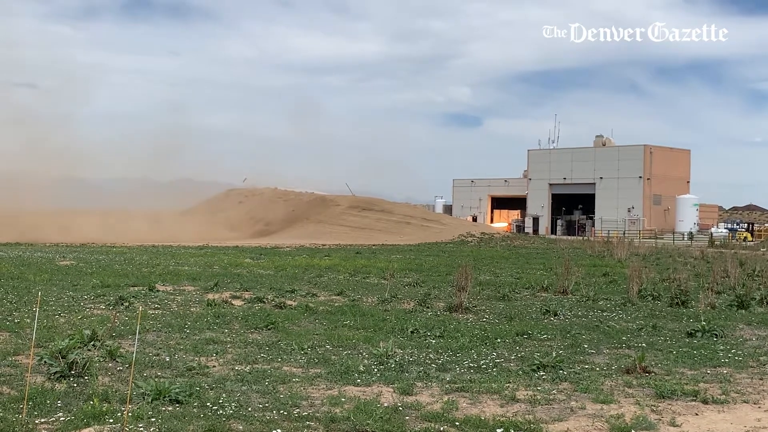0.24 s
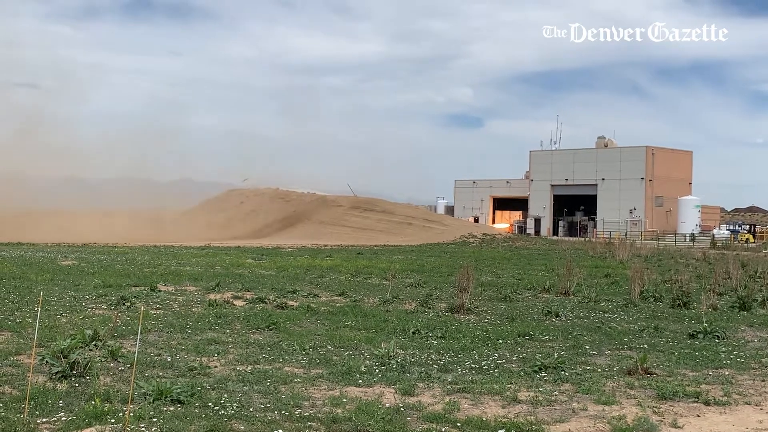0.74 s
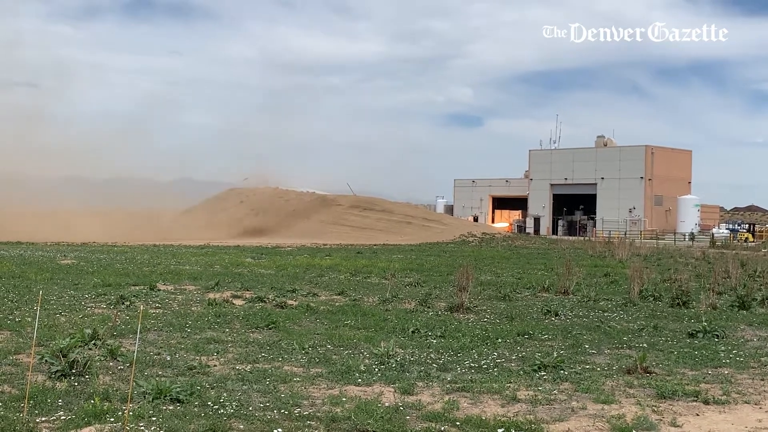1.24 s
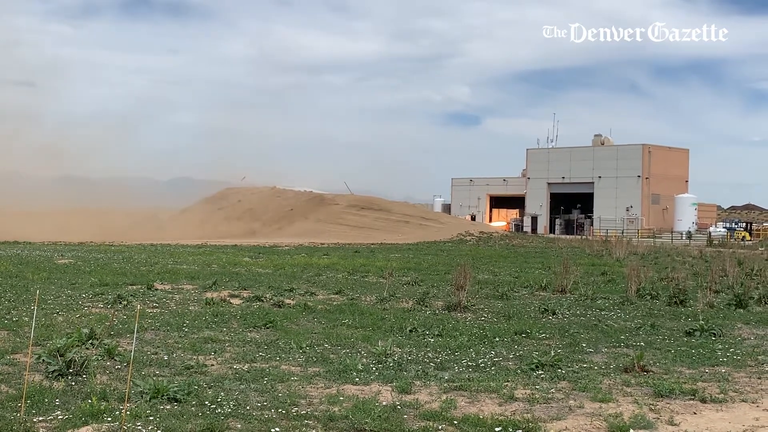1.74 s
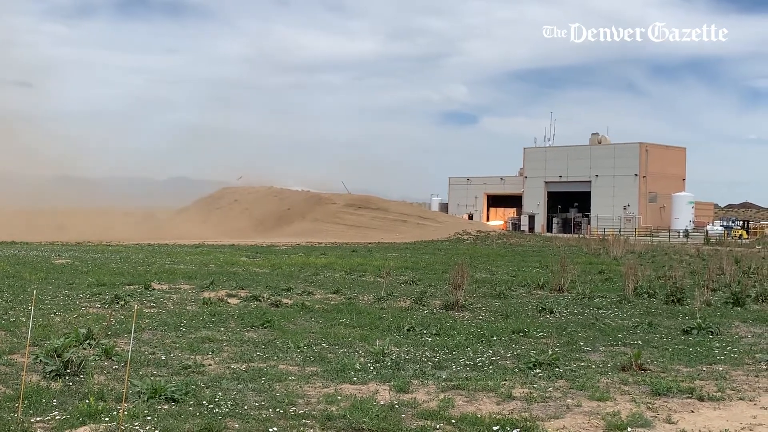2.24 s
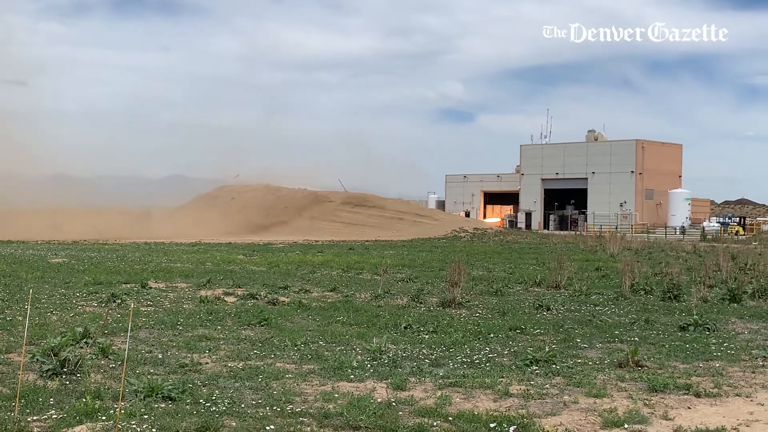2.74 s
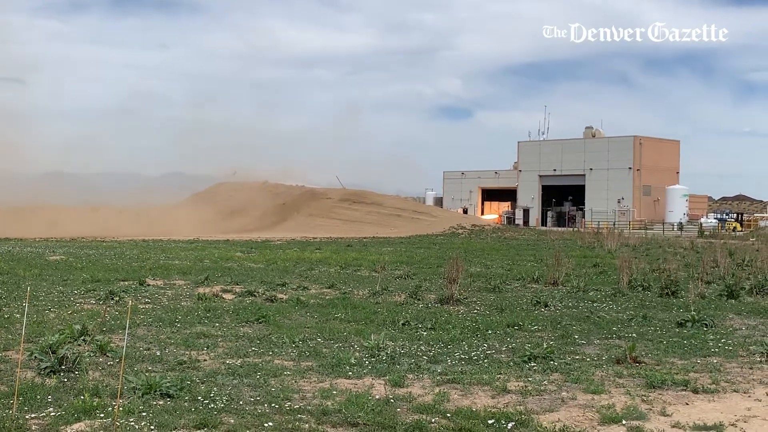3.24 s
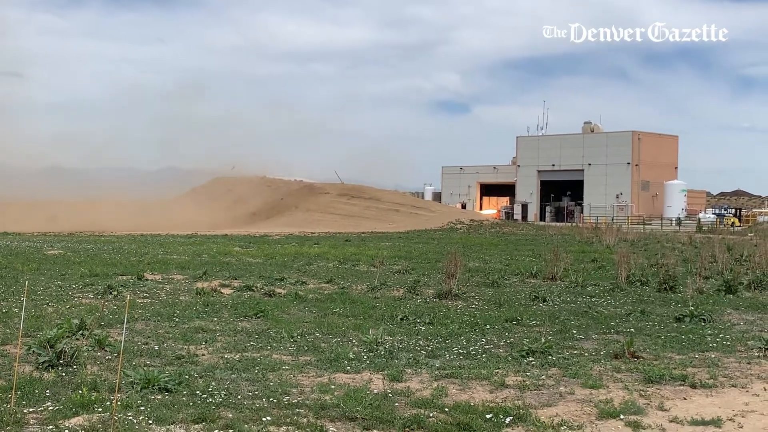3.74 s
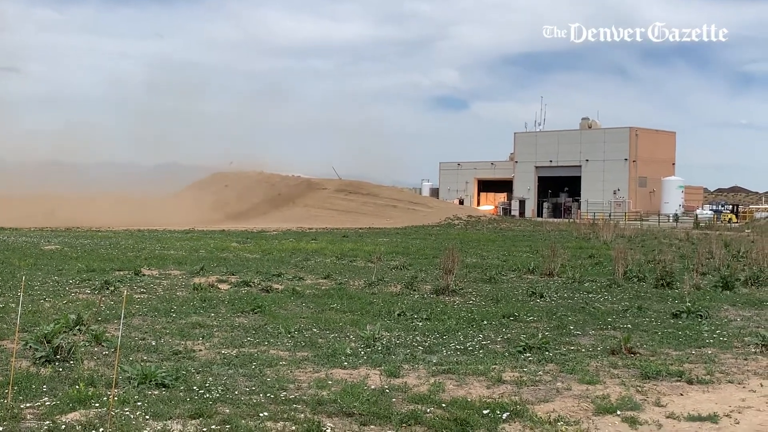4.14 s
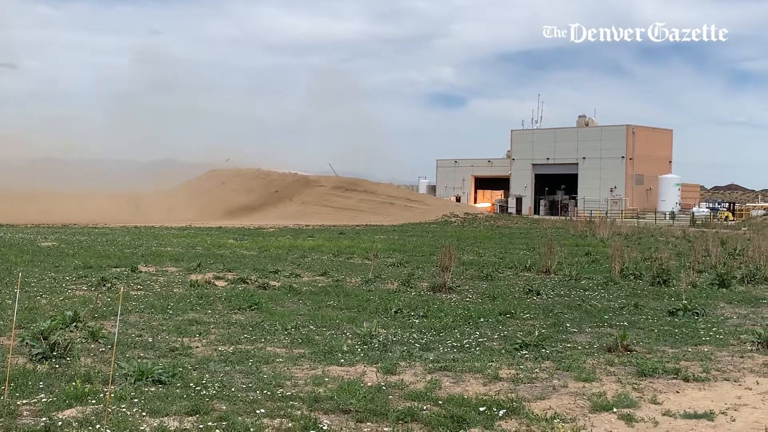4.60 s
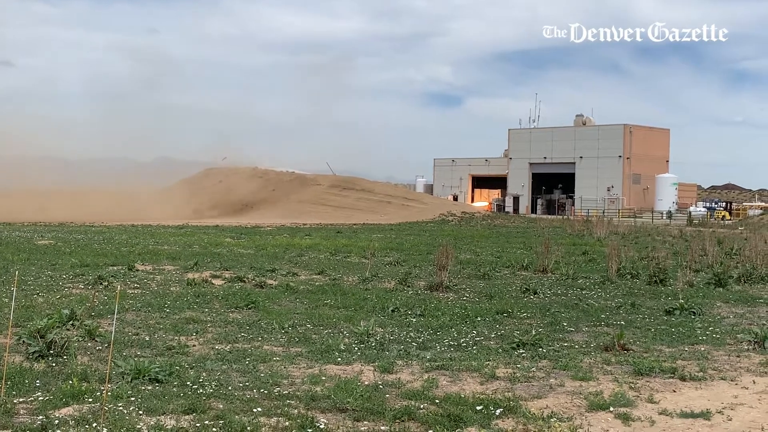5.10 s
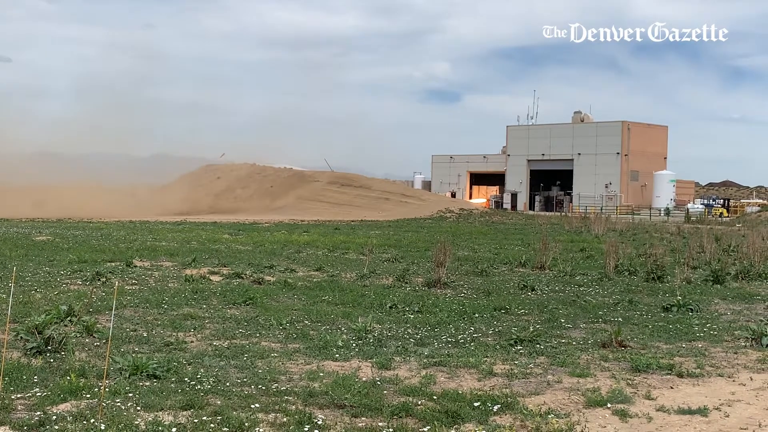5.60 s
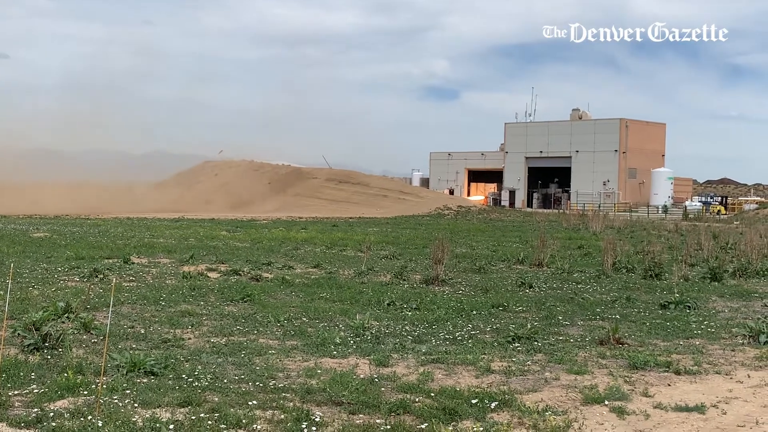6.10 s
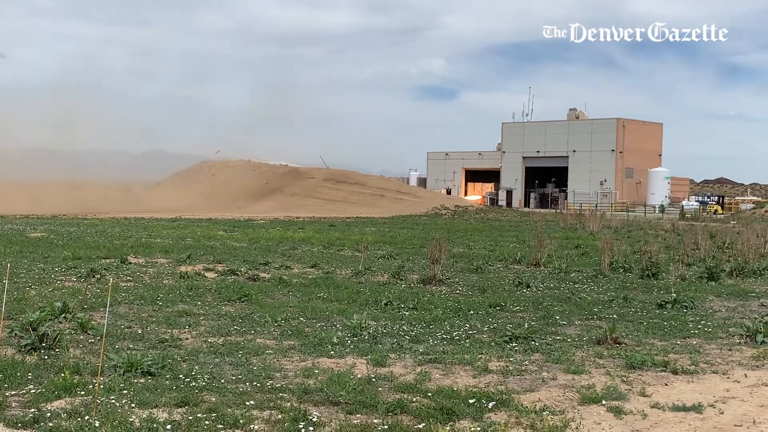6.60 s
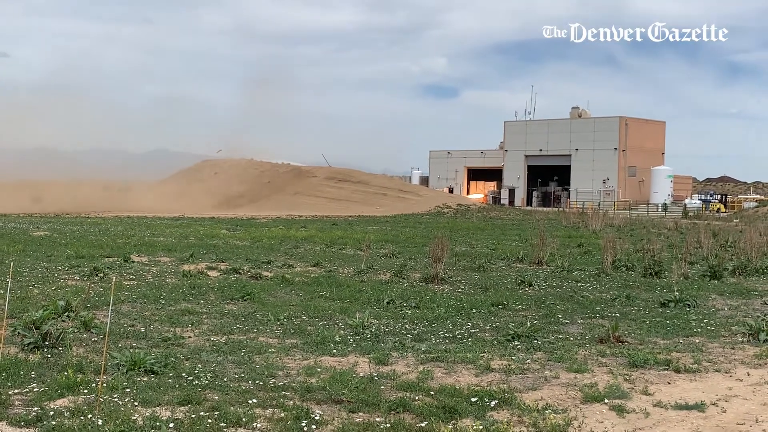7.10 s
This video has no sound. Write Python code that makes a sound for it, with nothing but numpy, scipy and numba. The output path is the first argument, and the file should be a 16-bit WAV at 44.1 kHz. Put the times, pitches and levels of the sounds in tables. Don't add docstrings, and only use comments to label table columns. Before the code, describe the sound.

Already at full force, a distant jet of burning exhaust thunders without pause over open grass. Low, thick rumbling fills the sound, while a rasping roar and faint hiss flutter above it, slowly dulling and brightening as if gently filtered. Sound scatters slightly from both sides. Near the end the hand-held phone turns and the hiss changes colour subtly; its bass stays compressed and crowded.

```python
import sys
import numpy as np
from scipy import signal
from scipy.fft import rfft, irfft, next_fast_len
from scipy.io import wavfile
from scipy.ndimage import uniform_filter1d, minimum_filter1d
from numba import njit

SR = 44100
rng = np.random.default_rng(int(sys.argv[2]) if len(sys.argv) > 2 else 0)


def put_to_file(sound):
    columns = np.atleast_2d(sound).T
    safe = np.clip(columns, -1, 1)
    whole_steps = np.round(safe * 32767)
    wavfile.write(sys.argv[1], SR, whole_steps.astype(np.int16))


def invert_db(x):
    u = np.asarray(x, float) / 20
    return 10 ** u


N = 324135
SIZE = next_fast_len(N + SR)
HZ = np.maximum(np.arange(SIZE // 2 + 1) * SR / SIZE, 1)

# frequency in Hz, density in dB per Hz.
RUMBLE_SPECTRUM = [(22.0, -70), (32.0, -60), (43.0, -48), (54.0, -40.5), (65.0, -38), (90.0, -38),
                   (130.0, -38.5), (170.0, -42.5), (220.0, -48), (300.0, -54.5), (370.0, -64.0),
                   (450.0, -66.3)]
# frequency in Hz, density in dB per Hz.
ROAR_SPECTRUM = [(370.0, -65), (520.0, -62), (750.0, -61.5), (1350.0, -63.5), (2000.0, -61), (2400.0, -66),
                 (2850.0, -70.0), (3750.0, -69.5), (4700.0, -76), (5700.0, -82.5), (6700.0, -80.5),
                 (8300.0, -86), (11000.0, -98.5), (15000.0, -122.4)]


def plume():
    jet = shaped(RUMBLE_SPECTRUM[:-2], ROAR_SPECTRUM)
    return at_ports(sliding_comb(jet))


# centre in Hz, width in Hz, depth up to 1.
ECHO_DIPS = [(968, 357, 0.44), (1340, 160, -0.39), (1683, 227, 0.67), (2010, 200, -0.28),
             (2810, 230, -0.38), (3090, 390, 0.88), (3500, 165, 0.67), (3760, 250, -0.14),
             (6450, 300, 0.36), (7650, 620, 0.62), (14000, 2500, -0.66)]


def echo_comb(scale):
    comb = 1
    for hz, width, depth in ECHO_DIPS:
        comb = comb * (1 - min(depth, 1) / (1 + 2j * (HZ - hz * scale) / width))
    return comb


def sliding_comb(jet):
    turn_shift, sway_shift, reach = -0.026, 0.0068, 0.04
    sway = np.pad(walk(1.5), (0, SIZE - N), mode="edge")
    slide = turn_shift * turned(np.arange(SIZE) / SR) + sway_shift * sway
    heard = 0
    for k in (-1, 0, 1):
        blend = np.interp(slide, (-reach, 0, reach), np.arange(-1, 2) == k)
        heard = heard + irfft(jet * echo_comb(1 + k * reach), SIZE) * blend
    return rfft(heard)


# frequency in Hz, level in dB, lead in radians.
PORT_DIFFERENCE = [(40, -1, -0.046), (170, -3, -0.27), (249, -6, 0), (396, 3.5, 0), (448, -4.5, -0.49),
                   (583, -8, 0.57), (810, -0.5, 0.41), (1130, -3.5, -0.31), (1550, -1.5, 0.43),
                   (2030, -3, 0.41), (2780, -0.7, 0.95), (3330, -7, 1.35), (4610, -3.5, 0.7),
                   (6180, -34, 2),
                   (6200, 1, 3.25), (7100, 1, 2.95), (9300, 0, 0), (11750, 0, -3.14), (13800, 0, -6.3),
               (15200, 0, -7.8)]


def at_ports(jet):
    hz, db, lead = np.transpose(PORT_DIFFERENCE)
    left = jet * invert_db(on_log(HZ, hz, db)) * np.exp(1j * on_log(HZ, hz, lead))
    return np.array([left, jet])


def turned(t):
    turn_s, length_s = 6.8, 0.3
    return (1 + np.tanh((t - turn_s) / length_s)) / 2


# frequency in Hz, level in dB.
TURN_COLOUR = [(1800, 0.1), (2700, -3.5), (3400, 3), (4500, -2), (6500, 4), (8200, 0.1)]


def turning_db(hz, t):
    return on_log(hz, *np.transpose(TURN_COLOUR)) * turned(t)


# time in seconds, centre in Hz, depth in dB.
GROUND_PATH = [(0, 370, 4.5), (.9, 400, 2.5), (1.6, 400, 1.5), (2.3, 510, 5.5), (3.2, 620, 3.5),
               (4.1, 760, 1), (4.7, 870, 2), (5.2, 1250, 1), (5.9, 1500, 0), (6.2, 420, 1), (6.7, 400, 5.5),
               (7.35, 310, 2.5)]


def ground_db(hz, t):
    s, dip_hz, depth = np.transpose(GROUND_PATH)
    octaves_away = np.log2(hz / np.interp(t, s, dip_hz))
    return -np.interp(t, s, depth) * bell(octaves_away / 0.33)


# time in seconds, roar level in dB, brightening in dB per octave.
AIR_BENDING = [(0, 0, -0.5), (.5, .5, 0), (1.35, 1.5, -0.5), (1.95, 0.5, -1.5), (2.25, 3, 0),
               (2.7, 1, -1.5), (3.0, 3.5, -2), (3.45, -0.5, -0.5), (4.0, -1.5, 0), (4.35, -1.5, -0.5),
               (4.8, -0.5, 1.5), (5.2, -1, 0.5), (5.6, 0.5, 1), (6.0, 0.5, 1.5), (6.6, -1.5, 1.5),
               (6.95, 0, -0.5), (7.35, 0, 1.5)]
# frequency in Hz, share.
BENDING_FELT = [(450, 0.01), (700, 0.59), (1250, 0.72), (2250, .6), (4500, 1.4), (9000, 0.76)]


def bending_db(hz, t):
    s, level, bright = np.transpose(AIR_BENDING)
    felt = on_log(hz, *np.transpose(BENDING_FELT))
    octaves_up = max(np.log2(hz / 4500), 0)
    return felt * np.interp(t, s, level) + octaves_up * np.interp(t, s, bright)


# time in seconds, length in seconds, centre in Hz, level in dB.
EDDY_SURGES = [(.4, 0.24, 200, 3), (.6, 0.33, 780, 2.5), (1.3, 0.09, 276, 4), (2.15, 0.12, 680, 5.5),
               (2.297, 0.25, 1300, 2), (2.903, 0.54, 278, -4), (3.05, .15, 150, 0.5), (3.4, .15, 2100, 1.5),
               (3.75, .35, 215, -4), (4.1, .15, 161, 0.5), (4.1, .3, 1550, 2), (4.5, 0.26, 420, 2),
               (4.9, 0.23, 224, 3), (5.25, .2, 2500, -1.5), (5.5, 0.56, 368, 2), (6.2, 0.26, 202, 1.5)]


def surges_db(hz, t):
    db = 0
    for at, length, centre, size in EDDY_SURGES:
        db = db + size * bell((t - at) / length) * bell(np.log2(hz / centre) / 0.19)
    return db


def drift_db(hz):
    t = np.arange(0, N, 64) / SR
    db = ground_db(hz, t) + bending_db(hz, t) + surges_db(hz, t) + turning_db(hz, t)
    db = db - db.mean()
    db = db - 10 * np.log10(np.mean(invert_db(db) ** 2))
    return np.interp(np.arange(N) / SR, t, db)


def air(spectra, flicker_db=0.94, hiss_flicker_db=1.0):
    centres = 160 * 2 ** (np.arange(19) / 3)
    out, twinkle = 0, walk(15.0)
    for k, hz in enumerate(centres):
        share = on_log(HZ, centres, np.arange(19) == k)
        twinkle = 0.45 * twinkle + 0.9 * walk(40)
        wander_db = on_log(hz, (500, 8000), (flicker_db, hiss_flicker_db)) * twinkle
        band = irfft(spectra * share, SIZE)[:, :N]
        out = out + band * invert_db(drift_db(hz) + wander_db * (k > 0))
    return out


# frequency in Hz, density in dB per Hz.
HAZE_SPECTRUM = [(35, -88), (90, -73), (220, -72), (400, -82), (700, -76.5), (1000, -78), (1650, -73),
                 (3200, -82.5), (5700, -86), (6500, -91), (8300, -95), (9300, -110), (11700, -117),
                 (15000, -130)]


def haze():
    return np.array([shaped(HAZE_SPECTRUM), shaped(HAZE_SPECTRUM)])


def shaped(table, join=()):
    hz, db = np.transpose(list(table) + list(join))
    noise = rfft(rng.standard_normal(SIZE))
    return noise * invert_db(on_log(HZ, hz, db)) * np.sqrt(SR / 2)


def on_log(hz, at_hz, values):
    return np.interp(np.log(hz), np.log(at_hz), values)


def bell(away):
    return np.exp(-0.5 * away ** 2)


def walk(rate):
    k = int(SR / rate)
    held = np.repeat(rng.standard_normal(N // k + 1), k)
    return 1.12 * uniform_filter1d(uniform_filter1d(held, k), k)[:N]


def scene():
    return air(plume() + haze())


@njit
def follow(x, attack, release):
    y, e = np.empty(len(x)), np.mean(x)
    for i in range(len(x)):
        e += (x[i] - e) * (attack if x[i] > e else release)
        y[i] = e
    return y


def squeeze(bass):
    top_db, ratio, ceiling_db = -20.5, 1.504, -8
    heard = follow(np.abs(bass).max(axis=0), 1 / (0.0021 * SR), 1 / (0.066 * SR))
    gain = np.minimum(invert_db(top_db) / heard, invert_db(6.0)) ** (1 - 1 / ratio)
    squeezed = bass * invert_db(2.5) * gain
    peaks = -minimum_filter1d(-np.abs(squeezed).max(axis=0), size=301)
    over = uniform_filter1d(peaks, size=301) / invert_db(ceiling_db)
    return squeezed / (1 + over ** 6) ** (1 / 6)


def low_pass(x):
    return signal.sosfilt(signal.butter(12, 15100, fs=SR, output="sos"), x)


def record(dry):
    bass = signal.sosfiltfilt(signal.butter(2, 300, fs=SR, output="sos"), dry)
    opening = np.minimum(np.arange(N) / (0.004 * SR), 1)
    start = np.sin(opening * np.pi / 2) ** 2
    mix = start * (dry - bass + squeeze(bass))
    return low_pass(mix)


dry = scene()
out = record(dry)
put_to_file(out)
```